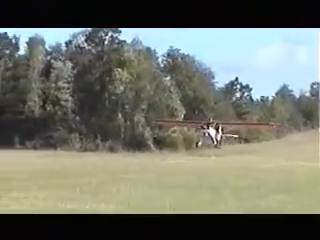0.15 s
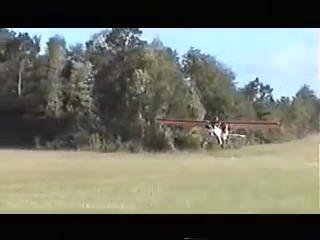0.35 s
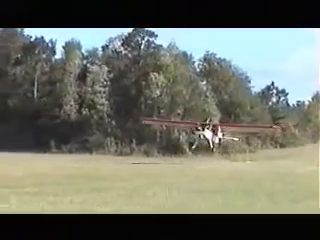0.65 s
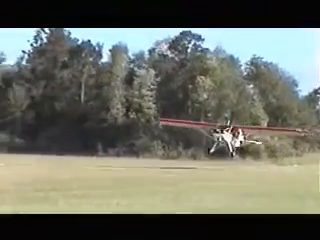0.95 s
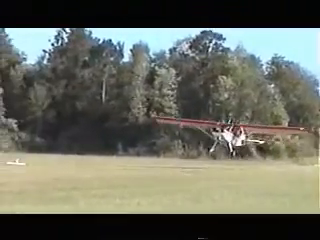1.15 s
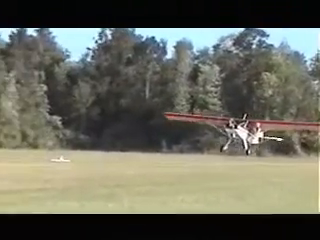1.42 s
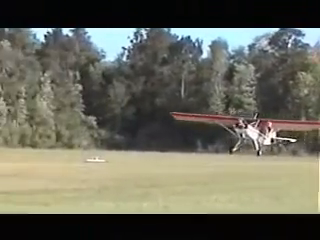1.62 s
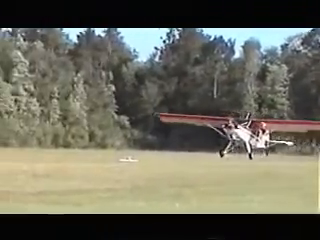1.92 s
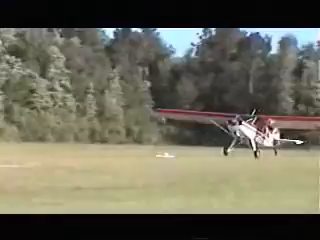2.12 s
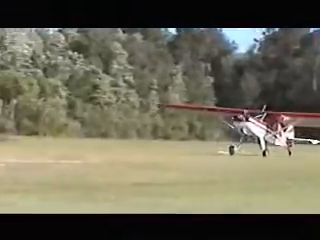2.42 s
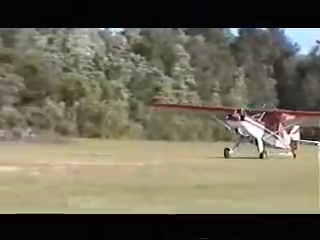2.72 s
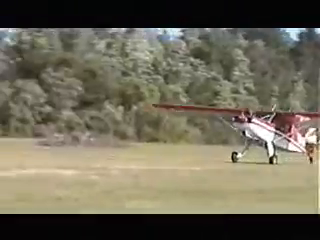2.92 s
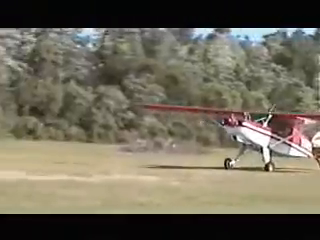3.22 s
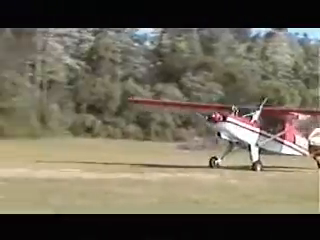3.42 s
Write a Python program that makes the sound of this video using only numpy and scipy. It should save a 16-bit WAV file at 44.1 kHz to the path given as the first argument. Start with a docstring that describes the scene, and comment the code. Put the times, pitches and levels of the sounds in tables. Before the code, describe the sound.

A small propeller plane at idle comes steadily nearer across an open field, uneven low thuds under pulsing blade whistles and rising airy hiss; two faint bird trills come early, with breeze and tape noise, left channel only.

```python
"""A light aircraft with its engine at idle power rolls closer over grass; only the left channel hears it.
Four cylinders thud unevenly through an exhaust pipe; a low drone beneath sinks slowly as the engine slows.
The two propeller blades whistle, each whistle swung up and down by the Doppler shift of the turning blade.
Air hisses over the airframe, the engine bay roars at close range, and a small bird trills twice.
A breeze and tape noise lie behind; the right channel holds low noise and a faint whine."""
import sys
import numpy as np
from scipy import signal
from scipy.fft import rfft, irfft
from scipy.io import wavfile
from scipy.ndimage import uniform_filter1d

SR = 44100
rng = np.random.default_rng(int(sys.argv[2]) if len(sys.argv) > 2 else 0)


def invert_db(x):
    """Field ratio 10**(x/20) for x, a level in decibels (scalar or array-like)."""
    u = np.asarray(x, float) / 20
    return 10 ** u


def store_wav(level_fs):
    """Save 16-bit WAV to argv[1]."""
    pcm = np.round(np.clip(np.atleast_2d(level_fs), -1, 1) * 32767)
    wavfile.write(sys.argv[1], SR, pcm.T.astype(np.int16))


N = 156555
T = np.arange(N) / SR


def curve(table, col):
    """Reads one column of a time table, with straight lines between its rows."""
    return np.interp(T, [row[0] for row in table], [row[col] for row in table])


def evened(x):
    """Scales a sound to an average (rms) level of 1."""
    return x / np.sqrt(np.mean(x ** 2) + 1e-20)


def resonate(x, pitch_hz, width_hz):
    """A resonance of gain 1 whose pitch may move: shift down to zero, smooth, shift back up."""
    turn = np.exp(2j * np.pi * np.cumsum(pitch_hz * np.ones(N)) / SR)
    decay = np.exp(-np.pi * abs(width_hz) / SR)
    smooth = signal.lfilter([1 - decay], [1, -decay], x / turn + 1e-18)
    return 2 * (turn * smooth).real


def resonate_twice(x, pitch_hz, first_width_hz, second_width_hz):
    """Two resonances in a row at one pitch, for steeper sides, scaled to rms 1."""
    return evened(resonate(resonate(x, pitch_hz, first_width_hz), pitch_hz, second_width_hz))


def drift(rate_hz):
    """Random wander of rms 1, made of noise that weakens above rate_hz."""
    spectrum = rfft(rng.standard_normal(N))
    weaken = 1 + (np.fft.rfftfreq(N, 1 / SR) / rate_hz) ** 4
    return evened(irfft(spectrum / weaken, N))


def noise(spectrum, patchy_db):
    """Noise of a given spectrum, rms 1, with patches in time and pitch that drift louder and softer."""
    bin_hz = np.fft.rfftfreq(1024, 1 / SR)
    real, imaginary, patch = rng.standard_normal((N // 256 + 5, 513, 3)).T
    patch = uniform_filter1d(patch, size=10, axis=0)
    patch = evened(uniform_filter1d(patch, size=10, axis=1))
    pitch_hz, level_db = np.transpose(spectrum)
    shape_db = np.interp(np.log(bin_hz + 1), np.log(pitch_hz + 1), level_db)[:, None]
    grains = (real + 1j * imaginary) * invert_db(shape_db + patchy_db * patch)
    return evened(signal.istft(grains, nperseg=1024, noverlap=768)[1][:N])


# The turning engine; the count jumps about a third of a turn at 1.46 s, heard as a small skip in the sound: #
# time_s, crankshaft_turns so far
CRANK_TURNS = [(0, .35), (.405, 7), (.906, 15), (1.46, 23.77), (1.461, 24.09), (1.962, 32), (2.41, 39),
               (2.8, 45.02), (3.167, 50.55), (3.55, 56.23)]


def crankshaft():
    """Counts crankshaft turns over time; the firings, drone and propeller all follow this count."""
    return curve(CRANK_TURNS, col=1)


# Loudness of the sources as the plane comes closer, before each source's own boosts:
# time_s, exhaust_db, overtones_db against the exhaust, air_hiss_db, whistle_db, drone_db
APPROACH_LEVELS = [(0, -51, -21, -68.5, -64.5, -52.5), (.5, -51.5, -12, -62.5, -59, -52),
                   (1.0, -49, -3, -58, -54.5, -50), (1.4, -48, -0.5, -53.5, -45, -50.5),
                   (1.85, -45.5, -11, -48, -37.5, -50), (2.2, -47, 5, -46, -38, -52),
                   (2.6, -42.5, 5, -46, -39.5, -48.5), (2.9, -43, 4.5, -46, -37, -46.5),
                   (3.0, -41, 3.5, -43, -37.5, -47), (3.3, -41.5, 4.5, -42.5, -36, -49),
                   (3.55, -42, 5, -39.5, -32, -50)]


def approach_db(col):
    """Reads the level of one source as the plane comes closer."""
    return curve(APPROACH_LEVELS, col)


# The four cylinders: firing_turn within the two-turn cycle, level_db
CYLINDER_FIRINGS = [(.13, -7), (.63, -6), (1.16, 0), (1.6, -1)]
# Exhaust pipe resonances: pitch_hz, width_hz (the first of two passes is twice as wide), level_db
PIPE_RESONANCES = [(97.1, 23.4, -2.5), (116, 29.2, -6), (61.3, 76, -4.5), (164, 32, -20), (207.7, 25, -15),
                   (305, 34, -26)]


def exhaust(crank):
    """Uneven firings and turbulent puffs ring the pipe; a drone at twice the firing rate lies beneath."""
    jitter_turns, spread_db, puff_db = .02, 2, -9
    overtone_from_hz, muffler_hz = 140, 330
    firings = np.zeros(N)
    luck = rng.standard_normal((30, len(CYLINDER_FIRINGS), 2))
    for k, (firing_turn, level_db) in enumerate(CYLINDER_FIRINGS):
        turns = 2 * np.arange(30) + firing_turn + jitter_turns * luck[:, k, 0]
        at = np.searchsorted(crank, turns)
        heard = (at > 0) & (at < N)
        firings[at[heard]] = invert_db(level_db + spread_db * luck[heard, k, 1])
    drive = evened(firings) + invert_db(puff_db) * rng.standard_normal(N)

    overtones = invert_db(approach_db(col=2))
    pipe = np.zeros(N)
    for pitch_hz, width_hz, level_db in PIPE_RESONANCES:
        ring = invert_db(level_db) * resonate_twice(drive, pitch_hz, 2 * width_hz, width_hz)
        pipe += ring * (overtones if pitch_hz > overtone_from_hz else 1)
    muffler = signal.butter(2, [50, muffler_hz], "band", fs=SR, output="sos")
    muffled = signal.sosfilt(muffler, pipe)

    drone_level = invert_db(approach_db(col=5) + 5.0 + 0.5 * drift(6.8))
    drone = drone_level * np.sin(2 * np.pi * 4 * crank + 1.8)  # four waves per crankshaft turn
    return invert_db(approach_db(col=1) + 3.5) * muffled + drone


# Bird notes, in two groups: start_s, level_db
BIRD_NOTES = [(0, -53.5), (0.051, -55), (.1, -58), (.165, -64), (.82, -54), (0.867, -58), (0.908, -56),
              (.953, -59), (0.996, -53), (1.042, -53)]


def bird():
    """Two trills of short notes, each a tone that rises in pitch while it swells and fades."""
    note_s, low_hz, high_hz = 0.021, 2220, 2510
    out = np.zeros(N)
    for start_s, level_db in BIRD_NOTES:
        progress = np.clip((T - start_s) / note_s, 0, 1)
        pitch_hz = low_hz + (high_hz - low_hz) * progress
        swell = np.sin(np.pi * progress)
        out += invert_db(level_db) * swell * np.sin(2 * np.pi * np.cumsum(pitch_hz) / SR)
    return out


# Colour of the breeze and tape noise: pitch_hz, level_db per Hz (only the shape counts)
FIELD_SPECTRUM = [(28, -6), (60, -25), (240, -21), (400, 0), (1010, -4), (1110, -5.5), (1870, -3),
                  (2040, -4), (3600, -12), (4780, -12.5), (6000, -8.5), (7800, -10), (11800, -10),
                  (13200, -120)]


def field():
    """Breeze and tape noise: a soft, slightly patchy hiss of constant overall level."""
    return invert_db(-55) * noise(FIELD_SPECTRUM, patchy_db=0.86)


# Blade-edge whistles: centre_hz, lowest_pitch_turn, loudest_turn, level_db against each other,
# half_swing_db (the loudness falls by up to twice this)
BLADE_WHISTLES = [(7900, .84, .98, 4, 21), (10150, .31, .53, 1, 21), (6700, .33, .48, -8, 12),
                  (9200, .33, .56, -10, 14), (5900, .3, .45, -10, 12), (3700, .8, .02, -11, 18),
                  (8600, .8, .86, -6, 15), (6200, .8, .97, -11, 12), (10000, .25, .32, -6, 16),
                  (4600, .3, .5, -12, 17), (5300, .82, .0, -11, 17), (3000, .3, .5, -15, 17),
                  (7300, .8, .92, -8, 13)]
# As the plane turns its side to the listener: time_s, doppler_swing as share of pitch,
# loudness_swing as share of full, whistle_db against the swish, flicker_db
VIEW_ANGLE = [(0, .125, .8, -1, 2), (1.0, .13, 1, 0, 2), (1.8, .145, 1, 0, 2), (2.05, .155, .6, -2, 2),
              (2.3, .165, .95, 0, 1.5), (2.8, .19, .8, -1, 2), (3.05, .2, .4, -5, 3.5),
              (3.55, .22, .2, -8, 4)]
# Colour of the propeller swish: pitch_hz, level_db per Hz (only the shape counts)
SWISH_SPECTRUM = [(2060, -60), (3500, -6), (4820, -11.5), (7180, 7), (10300, 3), (11500, -2), (11800, 1),
                  (12500, -77), (16200, -107), (22000, -120)]


def propeller(crank):
    """Each whistle rises as its blade swings toward the listener; a swish beats twice a turn."""
    width_hz, fuzz_share, wander_share = 300, .3, .01
    top_hz, fade_db_per_khz = 11100, 28.5  # whistles weaken above this pitch
    doppler_swing, loudness_swing = curve(VIEW_ANGLE, col=1), curve(VIEW_ANGLE, col=2)
    whistle_db, flicker_db = curve(VIEW_ANGLE, col=3), curve(VIEW_ANGLE, col=4)
    whistles = np.zeros(N)
    for centre_hz, lowest_turn, loudest_turn, level_db, half_swing_db in BLADE_WHISTLES:
        doppler = -doppler_swing * np.cos(2 * np.pi * (crank - lowest_turn))
        pitch_hz = centre_hz * (1 + doppler + wander_share * drift(12))
        clear = np.sqrt(2) * np.sin(2 * np.pi * np.cumsum(pitch_hz) / SR)
        fuzzy = resonate_twice(rng.standard_normal(N), pitch_hz, width_hz, width_hz)
        tone = (1 - fuzz_share) * clear + fuzz_share * fuzzy

        beat_db = half_swing_db * loudness_swing * (np.cos(2 * np.pi * (crank - loudest_turn)) - 1)
        fade_db = fade_db_per_khz * np.maximum(pitch_hz - top_hz, 0) / 1000
        total_db = level_db + 6 + beat_db + whistle_db + flicker_db * drift(33) - fade_db
        whistles += invert_db(total_db) * tone
    swish_db = -1 + 3.5 * np.cos(4 * np.pi * crank)
    swish = invert_db(swish_db) * noise(SWISH_SPECTRUM, patchy_db=-3.0)
    return invert_db(approach_db(col=4)) * (whistles + swish)


# Colour of the air hiss: pitch_hz, level_db per Hz (only the shape counts)
AIR_SPECTRUM = [(180, 4), (300, 1.5), (525, -9), (712, -2), (1030, -1.5), (1310, -5.5), (1650, -0.5),
                (2620, -4.5), (3860, -3), (4810, -11), (5500, -4), (7150, -11), (12100, -120)]


def airflow(crank):
    """Air and rolling hiss of the aircraft, beating slightly with the two blades."""
    beat_db = 1 * np.cos(4 * np.pi * crank)
    return invert_db(approach_db(col=3) + 4 + beat_db) * noise(AIR_SPECTRUM, patchy_db=1.0)


# Coloured roar of the engine bay: pitch_hz, width_hz of each of two passes, level_db against each other
BAY_BANDS = [(704, 200, -13.5), (1024, 270, -10), (1097, 56, -11.5), (1786, 460, -3.5), (2300, 300, -4),
             (4200, 680, 1)]
# Loudness of the roar as the plane comes close: time_s, level_db applied to the summed bands
BAY_LOUDNESS = [(0, -74), (1.0, -71), (1.6, -61), (2.1, -54.5), (2.85, -56), (3.0, -47), (3.55, -49)]


def engine_bay():
    """Noise in a few resonant bands, each wavering, that swells as the plane comes close."""
    roar = np.zeros(N)
    for pitch_hz, width_hz, level_db in BAY_BANDS:
        waver_db = 4.04 * drift(11.4)
        band = resonate_twice(rng.standard_normal(N), pitch_hz, width_hz, width_hz)
        roar += invert_db(level_db + waver_db) * band
    return invert_db(curve(BAY_LOUDNESS, col=1)) * roar


def scene():
    """The aircraft, the field and the bird at one microphone, on the left channel."""
    crank = crankshaft()
    left = exhaust(crank) + bird() + field()
    left += propeller(crank) + airflow(crank) + engine_bay()
    return np.array([left, np.zeros(N)])


def idle_input():
    """The unused right input: low noise and a faint steady whine."""
    low_noise = invert_db(-84) * drift(460)
    whine = invert_db(-84) * np.sin(2 * np.pi * 1960 * T)
    return low_noise + whine


# Constant converter offset, one row per channel (left, right): offset as share of full scale
CONVERTER_OFFSET = [
    [.001],
    [-.0016],
]


def band_limit(x):
    """A steep low-pass at the top of the band."""
    return signal.sosfilt(signal.butter(12, 12640, fs=SR, output="sos"), x)


def record(dry):
    """Limits the treble, then adds the idle right input and the converter's constant offset."""
    treble_limit = signal.butter(8, 11600, fs=SR, output="sos")
    limited = signal.sosfilt(treble_limit, dry)
    mix = limited + np.array([np.zeros(N), idle_input()]) + CONVERTER_OFFSET
    return band_limit(mix)


dry = scene()
out = record(dry)
store_wav(out)
```